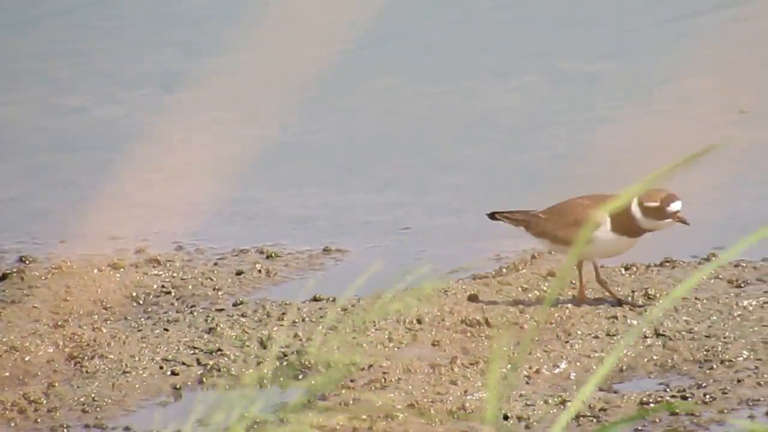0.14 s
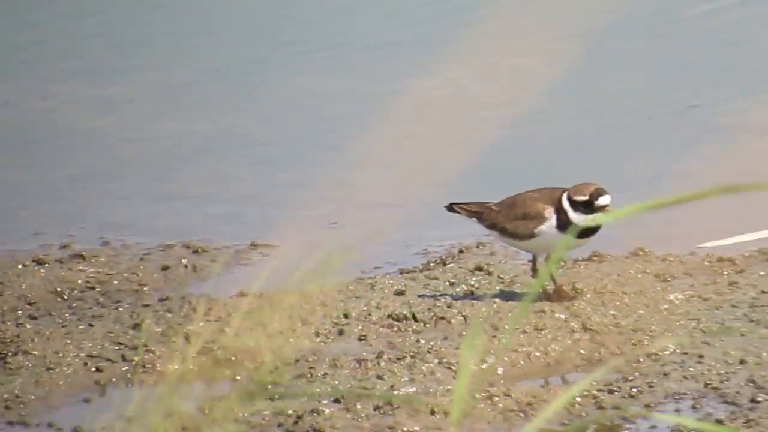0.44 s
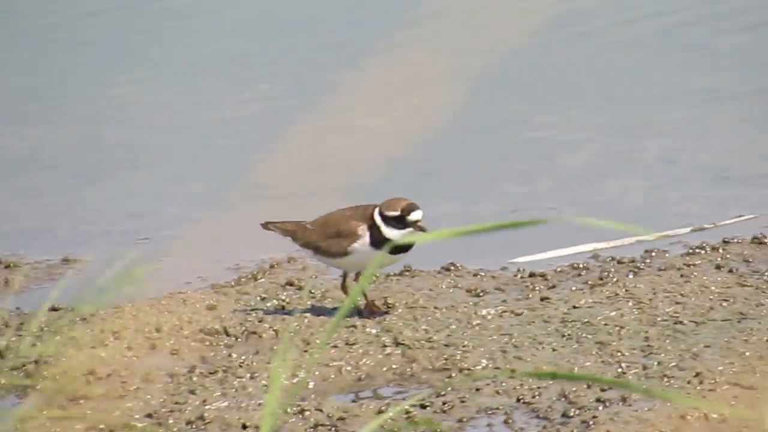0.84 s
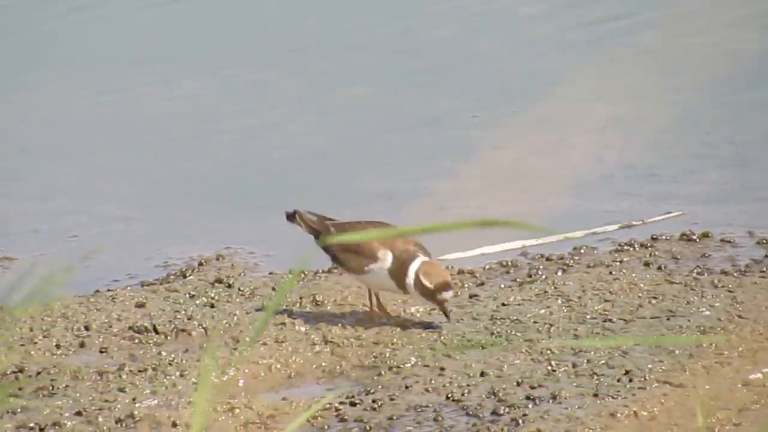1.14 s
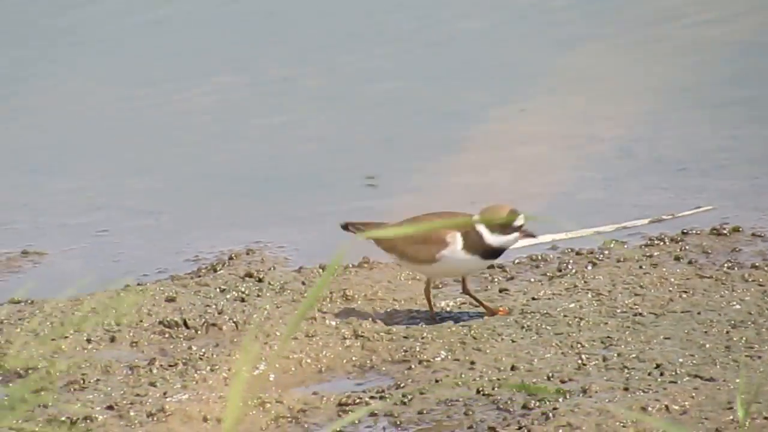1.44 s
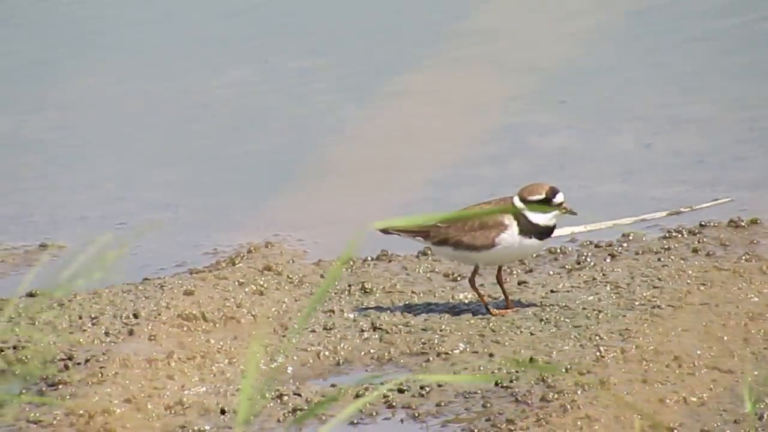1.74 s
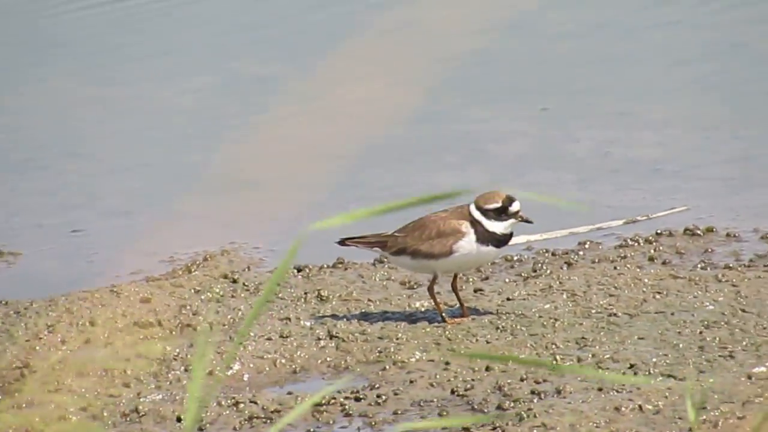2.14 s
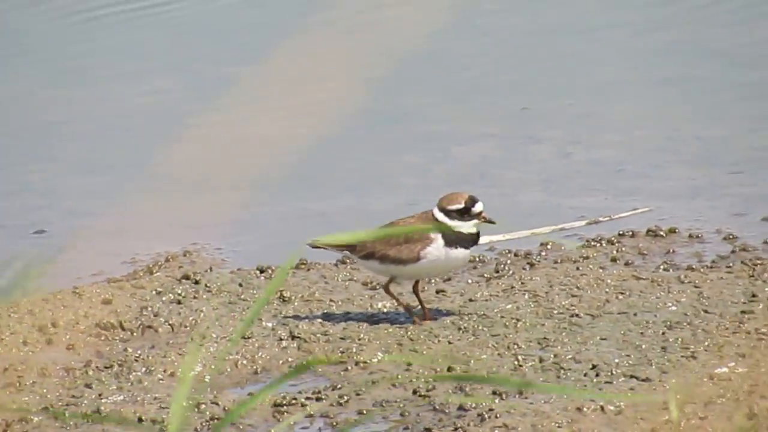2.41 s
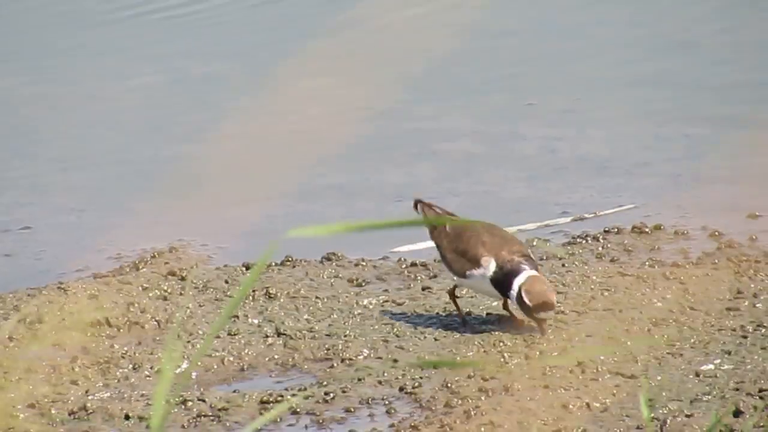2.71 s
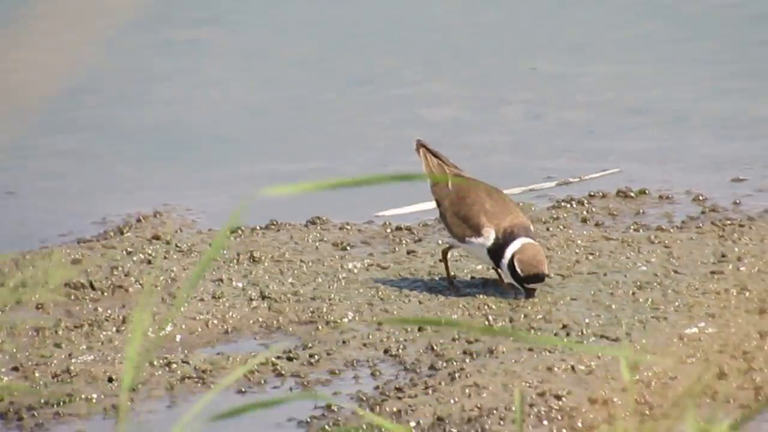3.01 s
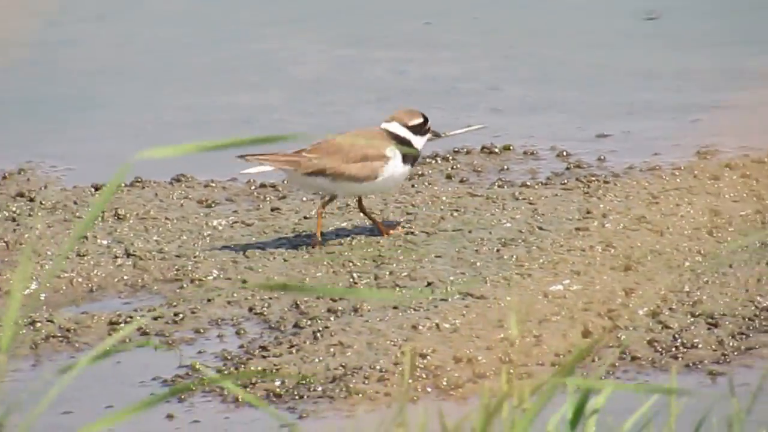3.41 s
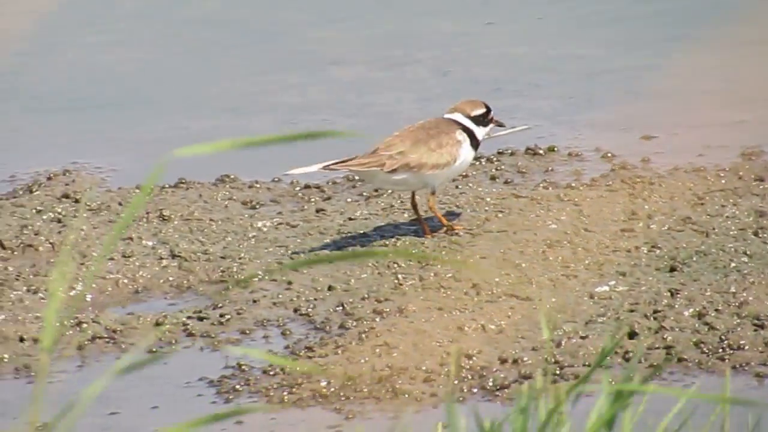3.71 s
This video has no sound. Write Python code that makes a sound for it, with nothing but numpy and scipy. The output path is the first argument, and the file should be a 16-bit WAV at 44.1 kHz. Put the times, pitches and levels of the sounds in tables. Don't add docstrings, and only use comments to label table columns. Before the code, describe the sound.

Wind rumble and hard clipping gusts over a faint watery hiss, a shorebird whistling once.

```python
import sys
import numpy as np
from scipy import signal
from scipy.fft import rfft, irfft
from scipy.io import wavfile

SR = 44100
rng = np.random.default_rng(int(sys.argv[2]) if len(sys.argv) > 2 else 0)


def voltage_ratio(decibels):
    exponent = np.asarray(decibels, float) / 20
    return 10 ** exponent


def generate_wav(sig):
    pcm = np.round(np.clip(np.atleast_2d(sig).T, -1, 1) * 32767).astype(np.int16)
    wavfile.write(sys.argv[1], SR, pcm)


N = 170226


def rms_one(x):
    return x / np.sqrt(np.mean(x ** 2) + 1e-20)


def in_time(rows):
    seconds, *columns = np.transpose(rows)
    return [np.interp(np.arange(N) / SR, seconds, column) for column in columns]


def at_hz(points, hz, outside=None):
    f, value = np.transpose(points)
    return np.interp(np.log(hz + 1e-3), np.log(f), value, left=outside, right=outside)


def drift(rate_hz):
    pole = np.exp(-80 * np.pi * rate_hz / SR)
    white = rng.standard_normal(N // 40 + 2002)
    slow = signal.lfilter([1], [1, -2 * pole, pole * pole], white)[2000:]
    return np.interp(np.arange(N) / 40, np.arange(len(slow)), rms_one(slow))


def coloured(colour, channels):
    hz = np.fft.rfftfreq(N, 1 / SR)
    white = rfft(rng.standard_normal((channels, N)))
    return white * voltage_ratio(at_hz(colour, hz, -200)), hz


# frequency in Hz, common share of power from 0 to 1.
COHERENCE = [(40, 0.94), (210, 0.87), (480, 0.24), (760, 0.38), (1150, 0.69), (2500, 0.46), (5000, 0.39),
             (12000, 0.4)]
# frequency in Hz, left minus right in dB.
FAR_TILT = [(60, 6), (180, 1.0), (540, 0.5), (1620, -1.0), (4850, -0.5), (14600, 0.5)]


def far_sound(colour):
    left_lag_s, flicker_db = 4.5e-5, 0.5
    (common, left, right), hz = coloured(colour, channels=3)
    share = np.clip(at_hz(COHERENCE, hz), 0, 1)
    tilt = voltage_ratio(at_hz(FAR_TILT, hz) / 2)
    late = np.exp(-2j * np.pi * hz * left_lag_s)
    left_port = tilt * (np.sqrt(share) * common * late + np.sqrt(1 - share) * left)
    right_port = (np.sqrt(share) * common + np.sqrt(1 - share) * right) / tilt
    pair = irfft(np.array([left_port, right_port]), N)
    return rms_one(pair) * voltage_ratio(flicker_db * drift(36.0))


# frequency in Hz, density in dB per Hz.
ROAR_COLOUR = [(20, 4.5), (130, -9), (205, -5.5), (270, -8.5), (420, -13.5), (500, -15.5), (1620, -22.5),
               (1760, -38.5)]


def water_roar():
    return voltage_ratio(-30.5) * far_sound(ROAR_COLOUR)


# frequency in Hz, density in dB per Hz.
HISS_COLOUR = [(1550, -11.5), (1750, 2), (3100, -2), (4400, -6), (9300, -13.5), (13000, -17.5),
               (14500, -26), (15600, -45)]


def grass_hiss():
    return voltage_ratio(-47.5) * far_sound(HISS_COLOUR)


def hum():
    level_db = -47.5 + 2.0 * drift(4.8)
    hz = 406.2 + 1.4 * drift(4.3)
    return np.sqrt(2) * voltage_ratio(level_db) * np.sin(2 * np.pi * np.cumsum(hz) / SR)


def tick():
    start_s, hz, peak_db, t60_s = .362, 12800, -36, .004
    t = np.maximum(np.arange(N) / SR - start_s, 0)
    decay = voltage_ratio(peak_db - 60 * np.minimum(t / t60_s, 4))
    ring = decay * np.sin(2 * np.pi * hz * t) * (t < 4 * t60_s)
    return ring * [[.45], [1]]


# time in seconds, pitch in Hz, level in dB.
WHISTLE_PATH = [
    (.848, 2650, -64),
    (.854, 2612, -51),
    (1.020, 2612, -51),
    (1.033, 2890, -42),
    (1.042, 3060, -46),
    (1.048, 3100, -66),
    (1.055, 3060, -45),
    (1.066, 2800, -45),
    (1.083, 2420, -64),
]


def bird():
    waver_db, pan_db = 1.0, -.5
    hz, level_db = in_time(WHISTLE_PATH)
    t = np.arange(N) / SR
    sounding = (t > WHISTLE_PATH[0][0]) & (t < WHISTLE_PATH[-1][0])
    level = np.sqrt(2) * sounding * voltage_ratio(level_db + waver_db * drift(40.0))
    tone = level * np.sin(2 * np.pi * np.cumsum(hz) / SR)
    return tone * voltage_ratio([[pan_db], [-pan_db]])


def at_ports(opposite, alike):
    left_bias_db = 0.43
    return (opposite * [[1], [-1]] + voltage_ratio(-13.5) * alike) * voltage_ratio([[left_bias_db], [-left_bias_db]])


# time in seconds, level in dB before the gain control.
BREEZE_LEVEL = [(0, -26.5), (.4, -23), (.45, -48), (.93, -40), (.98, -34), (1.25, -12), (1.55, -32.5),
                (1.85, -26), (1.93, -38), (2.0, -23.5), (2.25, -35), (2.55, -26.5), (2.95, -32),
                (3.05, -43), (3.5, -44), (3.62, -28), (3.76, -39), (3.86, -27)]
# frequency in Hz, density in dB per Hz.
BREEZE_SPECTRUM = [(15, 1), (35, -10.5), (60, 1.5), (100, -6.5), (160, -19.5), (300, -42), (600, -75)]


def breeze():
    lumps_db, lumps_per_s = 2, 3.3
    level_db, = in_time(BREEZE_LEVEL)
    lumps = [voltage_ratio(lumps_db * drift(lumps_per_s)) for _ in range(2)]
    noise = irfft(coloured(BREEZE_SPECTRUM, channels=2)[0], N)
    return at_ports(*(rms_one(noise * lumps) * voltage_ratio(level_db)))


# centre in seconds, level in dB, eddy pitch in Hz, length in seconds.
BUFFET_EVENTS = [(0.008, -29, 64, 0.059), (0.108, -13.5, 54.3, 0.018), (0.163, -10, 87, 0.032),
                 (.195, -18, 61.7, .029), (0.374, -19, 53.6, 0.032), (.990, -18, 46, 0.031),
                 (1.023, -11, 80, 0.012), (1.052, -10, 80, 0.018), (1.064, -16, 111, 0.01),
                 (1.144, -13, 59.6, 0.031), (1.402, -19.5, 71, 0.075), (1.188, -2.5, 210, 0.023),
                 (1.205, -7, 210, 0.0079), (1.225, -9.5, 250, 0.012), (1.62, -17.5, 69, .033),
                 (1.709, -11.5, 71.5, 0.044), (1.794, -17.5, 73, 0.012), (2.003, -20, 67, 0.025),
                 (2.041, -28, 44, 0.026), (2.267, -21.5, 45.2, 0.022), (2.335, -16.5, 46, 0.09),
                 (2.354, -12, 80, 0.012), (2.40, -10, 89, 0.03), (2.433, -8.5, 58.3, 0.075),
                 (3.828, -27, 49.4, 0.046), (2.529, -14, 62.6, 0.013), (2.622, -18.5, 58, 0.055),
                 (2.763, -15.5, 60.5, 0.02), (2.864, -19, 63, 0.01), (3.701, -21, 50, 0.019)]


def buffets():
    octaves_above, octaves_below = 0.62, 0.63
    size = 8192
    push = np.zeros((2, N + 2 * size))
    t = (np.arange(size) - size // 2) / SR
    hz = np.fft.rfftfreq(size, 1 / SR) + 1
    for s, db, eddy_hz, length in BUFFET_EVENTS:
        white = rng.standard_normal((2, size))
        breadth = np.where(hz > eddy_hz, octaves_above, octaves_below)
        band = np.exp(-.5 * (np.log2(hz / eddy_hz) / breadth) ** 2)
        eddies = irfft(rfft(white) * band, size)
        swell = np.exp(-2 * (t / length) ** 2)
        power = np.mean((eddies * swell) ** 2, axis=1, keepdims=True) / np.mean(swell ** 2)
        start = int(s * SR) + size // 2
        push[:, start:start + size] += voltage_ratio(db) * eddies / np.sqrt(power) * swell
    return at_ports(*push[:, size:size + N])


# centre in seconds, level in dB.
CRACKLE_EVENTS = [
    (1.043, -54),
    (1.164, -38),
    (1.175, -33),
    (1.180, -35),
    (2.369, -41),
    (2.388, -36),
    (2.392, -41),
]


def crackle():
    width_s, alike_share = .0006, .45
    t = np.arange(N) / SR
    opposite, alike = rng.standard_normal((2, N))
    bursts = sum(voltage_ratio(db) * np.exp(-.5 * np.clip((t - s) / width_s, -9, 9) ** 2) for s, db in CRACKLE_EVENTS)
    return bursts * (opposite * [[1], [-1]] + alike_share * alike)


# centre in seconds, peak in dB, width in seconds,
# sense +1 for push or -1 for pull, left minus right in dB.
SLAP_EVENTS = [(1.0425, -1, .0024, 1, 1.5), (1.164, 0, .0015, -1, 1.0), (1.1755, 3, .0019, -1, -6),
               (1.1795, 3, .002, 1, -3), (2.369, -2.5, .003, -1, 1.0), (2.374, -4, .0026, 1, 4),
               (2.385, -3, .0024, -1, -2), (2.3895, -1, .0018, 1, -5), (1.190, 6, .0018, 1, 0.1),
               (1.203, 5, .003, -1, -3), (1.2175, 8, .0013, 1, 4), (2.380, -4, .002, -1, -14),
               (2.416, -4, .0018, 1, 2), (2.459, 2, .0022, -1, 4), (1.714, -11, .004, 1, -3),
               (.163, -6, .0035, -1, -5)]


def slaps():
    t, out = np.arange(N) / SR, np.zeros((2, N))
    for s, db, width, sense, pan_db in SLAP_EVENTS:
        u = np.clip((t - s) / width, -9, 9)
        hump = np.sign(sense) * (1 - u ** 2) * np.exp(-.5 * u ** 2)
        out += hump * [[voltage_ratio(db + pan_db / 2)], [-voltage_ratio(db - pan_db / 2)]]
    return out


def scene():
    far = water_roar() + grass_hiss() + hum()
    near = tick() + bird()
    wind = breeze() + buffets() + crackle() + slaps()
    return far + near + wind


# start in seconds, change in dB.
GAIN_DUCKS = [
    (0.001, -8),
    (1.165, -7),
    (1.178, -3.5),
    (1.214, -3),
    (2.369, -1.5),
    (2.389, -4),
    (2.44, 0.5),
]


def gain_control(x):
    attack_s, hold_s, recover_s = .006, 0.078, 0.5
    t = np.arange(N) / SR
    gain_db = np.zeros(N)
    for s, db in GAIN_DUCKS:
        attack = np.clip((t - s) / attack_s, 0, 1)
        gain_db += db * attack * np.exp(-np.maximum(t - s - hold_s, 0) / recover_s)
    return x * voltage_ratio(gain_db)


# frequency in Hz, width in Hz, depth from 0 to 1.
MIC_NOTCHES = [(3945, 330, .76), (7868, 120, .95)]
# frequency in Hz, width in Hz, rise as a ratio (negative for a dip).
HOUSING_PEAKS = [(7640, 550, 0.66), (8500, 730, 0.56), (1320, 100, 0.25), (1040, 27, -0.065),
                 (3000, 230, -0.061), (44, 5.6, 0.6), (256, 35, -0.38), (309, 50, 0.31)]


def housing(x):
    hz = np.fft.rfftfreq(N, 1 / SR)
    bells = [(at, width, -depth) for at, width, depth in MIC_NOTCHES] + list(HOUSING_PEAKS)
    response = np.prod([1 + rise / (1 + (2 * (hz - at) / width) ** 2) for at, width, rise in bells], axis=0)
    top_cut = signal.cheby2(10, 50, 15900, fs=SR, output="sos")
    return signal.sosfilt(top_cut, irfft(rfft(x) * response, N))


def clip(x):
    knee = 8
    return x / (1 + np.abs(x) ** knee) ** (1 / knee)


def low_pass(x):
    return signal.sosfilt(signal.butter(12, 15150, fs=SR, output="sos"), x)


def record(dry):
    self_noise = voltage_ratio(-84.5) * rng.standard_normal(dry.shape)
    mix = clip(housing(gain_control(dry) + self_noise))
    return low_pass(mix)


dry = scene()
out = record(dry)
generate_wav(out)
```